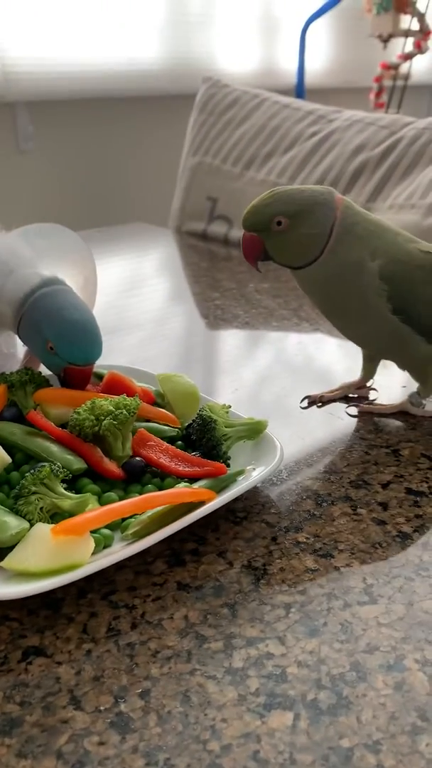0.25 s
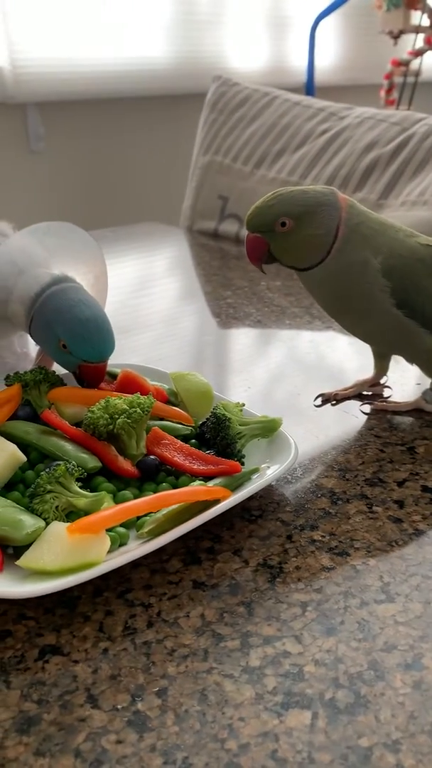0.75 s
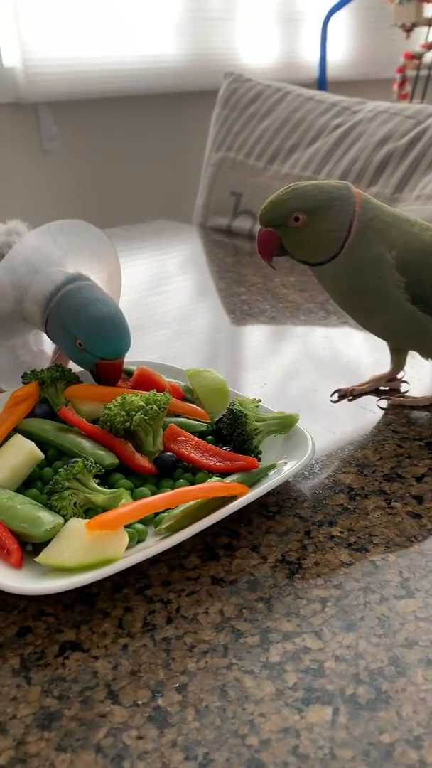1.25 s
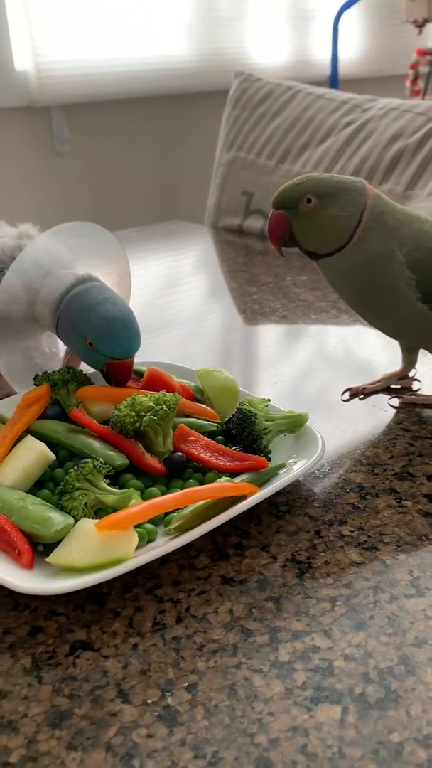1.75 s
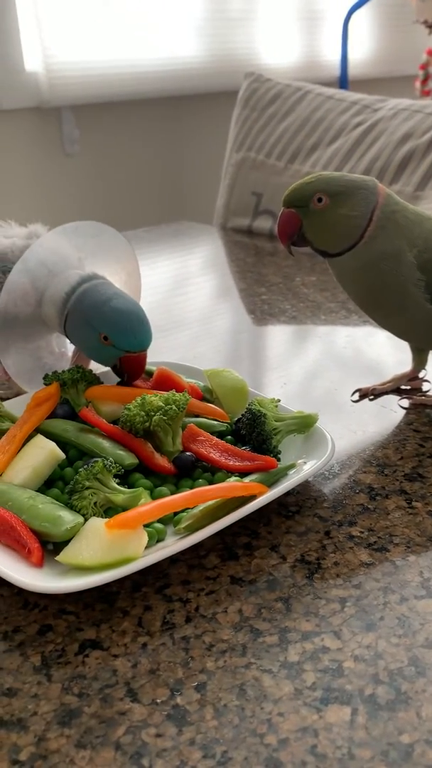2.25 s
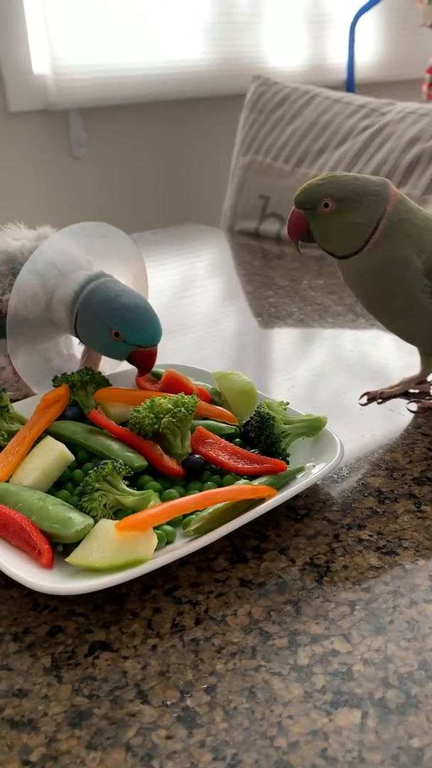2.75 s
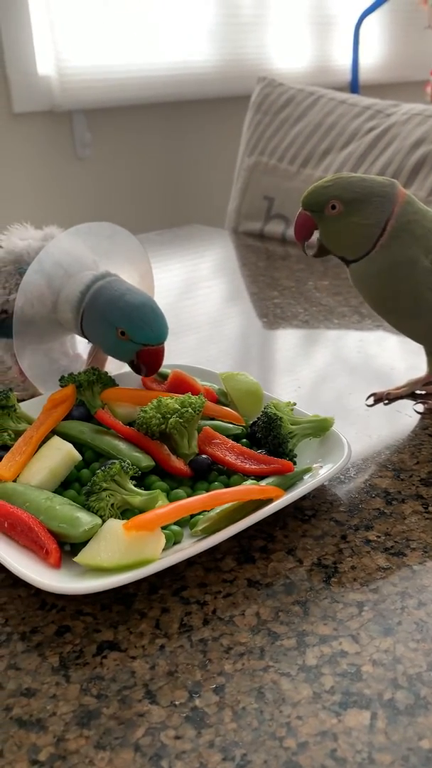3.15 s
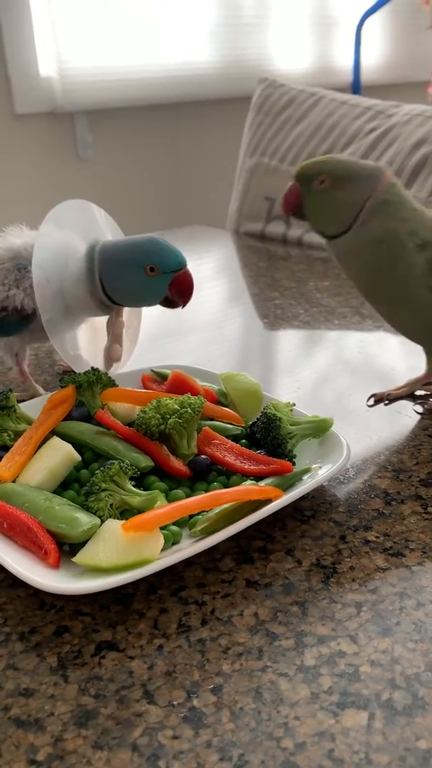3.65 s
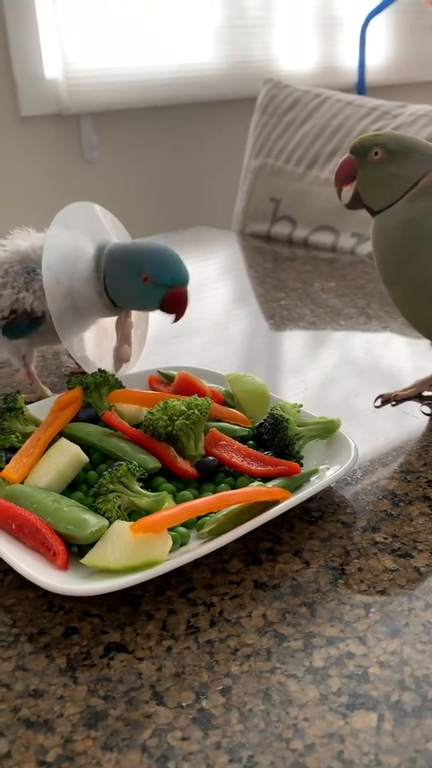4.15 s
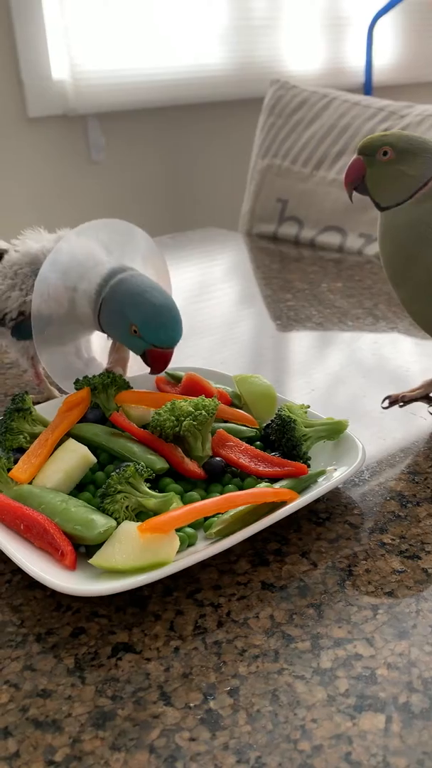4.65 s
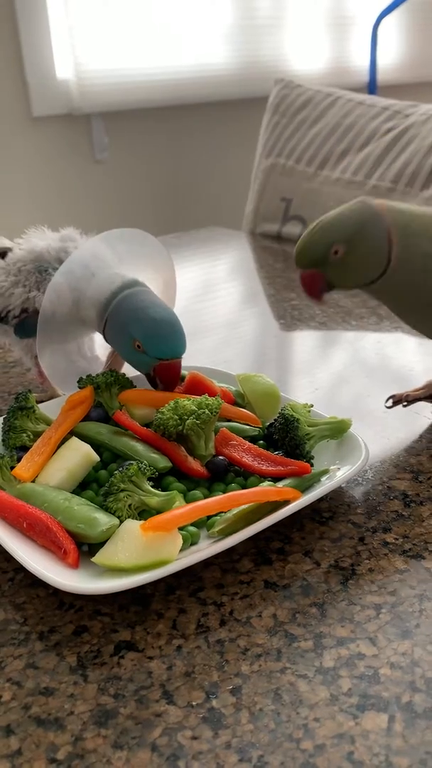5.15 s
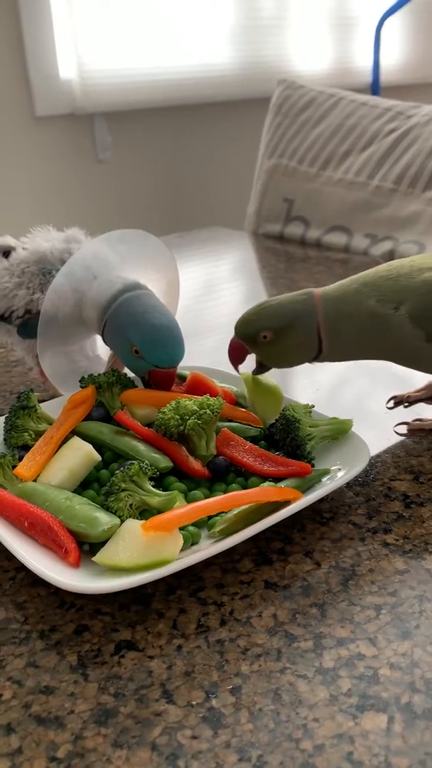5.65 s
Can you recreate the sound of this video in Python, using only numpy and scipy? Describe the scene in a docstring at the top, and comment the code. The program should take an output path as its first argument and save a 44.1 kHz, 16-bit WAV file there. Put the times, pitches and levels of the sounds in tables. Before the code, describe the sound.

A parrot whistles, chirps, hisses and trills in a quiet room over a low ventilation rumble, with beak clicks and soft plate knocks.

```python
"""A parakeet whistles, pips, trills and hisses in a quiet furnished room, as one of two at a plate of food.
Its syrinx gives harmonic stacks coloured by throat and mouth; the hisses are air ringing in the throat.
Beak clicks and plate knocks are struck decaying modes, close to a stone counter.
Ventilation rumbles below as coloured noise with motor tones, dipping at set times near the loudest calls.
A wall echo, near scatter and a diffuse tail place the birds; a small two-port recorder listens."""
import sys
import numpy as np
from scipy import signal
from scipy.fft import rfft, irfft, next_fast_len
from scipy.io import wavfile
from scipy.ndimage import uniform_filter1d

SR = 44100
rng = np.random.default_rng(int(sys.argv[2]) if len(sys.argv) > 2 else 0)


def file_out(sig):
    """Save sig as 16-bit WAV at sys.argv[1]."""
    # one column per channel
    cols = np.atleast_2d(sig).T
    # limit, then scale
    lim = np.clip(cols, -1, 1)
    pcm = np.round(lim * 32767).astype(np.int16)
    wavfile.write(sys.argv[1], SR, pcm)


N = 259308


def amp(db):
    """Decibels to gain."""
    return 10 ** (np.asarray(db) / 20)


def rms_one(x):
    """Scale to rms 1."""
    return x / np.sqrt(np.mean(x ** 2) + 1e-20)


def at_hz(points, hz):
    """Read a (Hz, value) table on a log frequency axis."""
    p = np.array(points)
    return np.interp(np.log(np.maximum(hz, 1)), np.log(p[:, 0]), p[:, 1])


def filtered(x, response):
    """Multiply the spectrum by response(Hz), padded so the end does not wrap round."""
    size = next_fast_len(x.shape[-1] + 4096)
    spectrum = rfft(x, size) * response(np.fft.rfftfreq(size, 1 / SR))
    return irfft(spectrum, size)[..., :x.shape[-1]]


def coloured(spectrum, channels=1):
    """Noise with a spectrum in dB per Hz, scaled to rms 1."""
    white = rng.standard_normal((channels, N))
    return rms_one(filtered(white, lambda hz: amp(at_hz(spectrum, hz))))


def drift(rate_hz, size):
    """Slow random wander of rms 1: noise through a two-pole low-pass."""
    r = np.exp(-2 * np.pi * rate_hz / SR)
    settle = SR // 4
    noise = rng.standard_normal(size + settle)
    return rms_one(signal.lfilter([1], [1, -2 * r, r * r], noise)[settle:])


def add(out, rows, make, fade_s):
    """Interpolate the rows over their samples, sound them, fade both ends and mix into out."""
    s, *columns = np.transpose(rows)
    at = np.arange(int(s[0] * SR), min(int(s[-1] * SR), N))
    t = at / SR
    # a sound that lasts to the very end gets no closing fade
    runs_to_end = s[-1] > N / SR - .01
    edge = np.clip(np.minimum(t - s[0], s[-1] - t + runs_to_end) / fade_s, 0, 1)
    sound = make(at, *[np.interp(t, s, c) for c in columns])
    out[at] += np.sin(edge * np.pi / 2) ** 2 * sound


# ventilation spectrum: hz, level_db (per Hz)
AIR_SPECTRUM = [(15, -39), (28, -19.5), (45, -4), (84, -7), (120, -3.5), (357, -4), (500, -13),
                (733, -17.5), (1640, -20.5), (2200, -27.5), (3460, -33), (6360, -39), (9000, -44),
                (15000, -66)]
# level of the rumble before the dips: time_s, level_db
AIR_LEVEL = [(0, -40.5), (1.5, -41), (2.9, -42.5), (3.5, -45.5), (4.5, -46.5), (5.0, -45.5), (5.88, -44.5)]
# how alike the rumble is at left and right: hz, likeness (0-1)
AIR_LIKENESS = [(40, .997), (70, .99), (140, .94), (280, .77), (500, .45), (800, .05), (16000, .05)]
# motor tones: hz, level_db, width_hz, steady_share (0-1)
MOTOR_TONES = [(64.8, -49.5, 6.9, 0.07), (107.6, -53, 6.4, 0.01), (242.6, -55.5, 2.4, 0.6),
               (355.8, -53.5, 6.5, 0.2), (481, -58, 3.2, 0), (1856, -60.5, 7.4, .75)]
# dips of the rumble: deepest_from_s, hold_s, sink_time_s, depth_db
RUMBLE_DIPS = [(.65, 0.057, 0.064, -10), (1.656, 0.062, .07, -12.5), (3.255, 0.069, .3, -17),
               (4.127, .01, .04, -7.5), (4.42, .01, .15, -7)]
DIP_RECOVER_S = 0.17


def ventilation():
    """Broad rumble, alike on both sides only in the bass, with centred motor tones that waver."""
    def likeness(hz):
        return np.clip(at_hz(AIR_LIKENESS, hz), 0, 1)

    mid, side = coloured(AIR_SPECTRUM, channels=2)
    mid = filtered(mid, lambda hz: np.sqrt((1 + likeness(hz)) / 2))
    side = filtered(side, lambda hz: np.sqrt((1 - likeness(hz)) / 2))
    t = np.arange(N) / SR
    s, level_db = np.transpose(AIR_LEVEL)
    total_db = np.interp(t, s, level_db)
    for deepest_s, hold_s, sink_s, depth_db in RUMBLE_DIPS:
        held_to_s = deepest_s + hold_s
        corners_s = [deepest_s - sink_s, deepest_s, held_to_s, held_to_s + DIP_RECOVER_S]
        total_db = total_db + np.interp(t, corners_s, [0, depth_db, depth_db, 0])
    gain = amp(total_db)
    out = gain * (mid + side * np.array([[1], [-1]]))
    for hz, tone_db, width_hz, steady in MOTOR_TONES:
        wander = drift(width_hz, N) + 1j * drift(width_hz, N)
        waver = steady * np.sqrt(2) + (1 - steady) * wander
        tone = np.real(waver * np.exp(2j * np.pi * hz * t))
        out = out + amp(tone_db) * gain / gain.mean() * tone   # tones dip with the rumble
    return out


def struck(events, modes):
    """Each blow rings every decaying mode with a random strength of its own."""
    s, strength_db = np.transpose(events)
    out, spread = np.zeros(N), rng.standard_normal((len(s), len(modes)))
    for k, (hz, level_db, t60_s) in enumerate(modes):
        blows = np.full(N, 1e-18)
        blows[(s * SR).astype(int)] = amp(strength_db + level_db - 7.5 + 3.0 * spread[:, k])
        r, w = amp(-60 / (t60_s * SR)), 2 * np.pi * hz / SR
        out += signal.lfilter([0, np.sin(w)], [1, -2 * r * np.cos(w), r * r], blows)
    return out


# beak clicks: time_s, strength_db (relative)
BEAK_CLICKS = [(0.155, -58.5), (0.3214, -50), (0.4894, -46), (0.9394, -56), (1.024, -47.5), (1.092, -27),
               (1.1651, -11), (3.6293, -41.5), (5.6914, -39)]
# ringing of the beak: hz, level_db, t60_s
BEAK_MODES = [(1200, -13, .004), (4300, -30, .003), (7040, 0, 0.0037), (8500, 11, .002),
              (11400, -8.5, .003), (14800, -20, .002)]
# beak knocks on the plate: time_s, strength_db (relative)
PLATE_KNOCKS = [(0.167, -23.5), (1.306, -27), (3.781, -24), (5.476, -22), (5.659, -26), (5.684, -23)]
# ringing of the plate: hz, level_db, t60_s
PLATE_MODES = [(480, -6, .02), (700, -5, 0.041), (950, -4.5, 0.0084), (1250, 5, .015), (1700, -6, 0.036)]
KNOCK_SOFT_HZ = 1500   # low-pass of the soft contact


def beaks():
    """Dry clicks of the beak, and duller knocks on the plate softened by a low-pass."""
    soft_contact = signal.butter(2, KNOCK_SOFT_HZ, fs=SR, output="sos")
    knocks = signal.sosfilt(soft_contact, struck(PLATE_KNOCKS, PLATE_MODES))
    return struck(BEAK_CLICKS, BEAK_MODES) + knocks


# throat weighting of overtones and leaking breath: hz, level_db
THROAT_COLOUR = [(150, -46.5), (400, -27.5), (1200, -13), (2000, -9), (3000, -7), (4000, -3.5), (5000, 1.5),
                 (6000, -4.5), (7500, -4.5), (9500, -1), (11500, -14), (13000, -16.5), (16000, -16.5)]
BREATH_AIR = coloured(THROAT_COLOUR)[0]
MOUTH_DB, MOUTH_OCTAVES = 9.5, 0.17   # height and half-width of the mouth resonance
FULL_VOICE_DB = -15   # level of the fully driven voice
# dB per overtone at full voice, extra for each dB softer, and the steepest fall allowed
FALL_DB, FALL_PER_SOFT_DB, DULLEST_DB = -1.11, -0.1455, -6.5
ROUNDING = .04   # share of a call over which pitch bends are rounded


def syrinx(at, hz, level_db, mouth_hz, first_db, breath_db, duller_db, odd_db):
    """A harmonic stack, duller when soft, shaped by throat and mouth; air leaks once a cycle."""
    hz = uniform_filter1d(hz, 1 + int(ROUNDING * len(at)), mode="nearest")
    jitter = 1 + .003 * drift(90, len(at))
    turn = 2 * np.pi * np.cumsum(hz * jitter) / SR
    k = np.arange(1, 17)[:, None]   # harmonic numbers
    soft_db = FULL_VOICE_DB - level_db
    fall_db = np.maximum(FALL_DB + FALL_PER_SOFT_DB * soft_db + duller_db, DULLEST_DB)
    mouth_db = MOUTH_DB * np.exp(-(np.log2(k * hz / mouth_hz) / MOUTH_OCTAVES) ** 2)
    stack_db = at_hz(THROAT_COLOUR, k * hz) + mouth_db + fall_db * (k - 1)
    stack_db = stack_db + first_db * (k == 1) + odd_db * (k % 2) * (k > 1)
    gains = amp(stack_db) * (k * hz < SR * .4)
    gains = gains * np.sqrt(2 / np.sum(gains ** 2, axis=0))   # stack at rms 1 before the flutter
    flutter = amp(2.0 * np.array([drift(50, len(at)) for _ in k]))
    tone = np.sum(gains * flutter * np.sin(k * turn), axis=0)
    leak = amp(breath_db) * BREATH_AIR[at] * (1 + 0.3 * np.sin(turn))
    return amp(level_db) * (tone + leak)


def short_note(out, s, ms, first_hz, last_hz, *settings):
    """One gliding note around its centre, swelling to the middle and fading at once."""
    half_s = ms / 2000
    rows = [(s - half_s, first_hz, *settings), (s + half_s, last_hz, *settings)]
    add(out, rows, syrinx, half_s)


# short pips: centre_s, length_ms, first_pitch_hz, last_pitch_hz, level_db, mouth_hz,
# fundamental_lift_db, breath_db (against the note)
SHORT_PIPS = [(.172, 15.4, 757, 560, -32, 4160, 11.5, -34), (1.309, 4.9, 662, 1102, -27.5, 4170, 9.5, -11),
              (1.485, 6, 1248, 1250, -21, 3800, 6.5, -13), (1.511, 6.8, 1232, 962, -20, 4400, 7, -18.5),
              (3.784, 8, 1152, 1550, -26.5, 4200, -17, 2.5),
              (3.948, 6.27, 1700, 2208, -9.5, 3730, -6.5, -8), (5.48, 9, 788, 756, -32.5, 1610, 14.5, -11),
              (5.661, 7.3, 1200, 1145, -17, 5520, 8, -2.7), (5.685, 6.2, 1790, 1700, -23, 5100, 17, -1.5)]


def pips():
    """Brief syrinx notes whose overtones fall off faster than in the long calls."""
    out = np.zeros(N)
    for row in SHORT_PIPS:
        short_note(out, *row, -2.5, 0)   # extra fall in dB per overtone; odd overtones untouched
    return out


# whistled calls, one curve each: time_s, pitch_hz, level_db, mouth_hz, fundamental_lift_db
WHISTLE_CURVES = [
    [(.365, 1200, -42, 2348, 19), (.378, 1168, -33, 2350, 19.5), (.432, 1162, -32, 2296, 18),
     (.444, 934, -33, 1900, 15.5), (.458, 793, -46.5, 1700, 12)],
    [(.518, 1786, -27, 4730, 2), (.548, 1657, -23.5, 4730, 11), (.575, 1667, -23, 4300, 12),
     (.597, 1830, -12.5, 3700, 3.5), (.625, 1901, -15.5, 3800, .6), (.654, 1951, -24, 4220, -0.5),
     (.68, 1915, -41.5, 4240, 17.5)],
    [(1.603, 1312, -28.5, 3500, 5), (1.609, 2020, -13, 4030, -3.5), (1.614, 2459, -15, 4630, 5),
     (1.622, 1975, -11.5, 3800, -7), (1.631, 1362, -20, 3450, -0.7), (1.641, 950, -18, 2830, 5.5),
     (1.652, 620, -45, 2970, 4.5)],
    [(2.05, 600, -55, 3070, 15), (2.11, 948, -44.5, 3380, 27), (2.164, 1216, -37, 2450, 19),
     (2.21, 1436, -39, 3340, -3), (2.314, 1461, -23.5, 4090, 1), (2.38, 1430, -23.5, 4240, 0),
     (2.444, 1290, -17.5, 4190, 2), (2.5, 1195, -19.5, 4500, 7), (2.53, 737, -33.5, 4450, 5.5)],
    [(2.845, 480, -32, 2570, 10), (2.869, 1035, -33, 2480, 14.5), (2.889, 1261, -29, 2560, 11.5),
     (2.937, 1606, -20.5, 3420, 5), (3.01, 1944, -15.5, 4540, -5), (3.06, 2288, -16, 5180, -4.5),
     (3.12, 2400, -24, 5110, 5), (3.15, 2466, -19, 4900, 5.5), (3.179, 2522, -22.5, 4800, 11.5),
     (3.219, 2182, -15.5, 4100, -6.5), (3.263, 1640, -27, 3580, -7), (3.3, 885, -38, 3295, -1)],
    [(4.195, 1654, -27.5, 4420, -2), (4.247, 1530, -25, 4150, -7.3), (4.305, 1503, -26.5, 3270, -4.5),
     (4.347, 1458, -24, 4420, -7), (4.415, 1297, -19.5, 4240, -3), (4.451, 1264, -22.5, 4900, -2),
     (4.475, 787, -34, 4740, 3.5)],
    [(5.795, 1989, -49.5, 2670, 13), (5.821, 2018, -40.5, 2670, 11), (5.861, 2732, -16.5, 2950, 1),
     (5.88, 2890, -11, 2915, -7.5)],
]
# breath against the tone: clear limit, hoarse limit, rise per octave/s of glide
CLEAR_DB, HOARSE_DB, DB_PER_GLIDE = -37, -18, 1.3


def whistled_calls():
    """Long gliding syrinx calls, breathier where the pitch moves fast."""
    out = np.zeros(N)
    for rows in map(np.array, WHISTLE_CURVES):
        glide = np.abs(np.gradient(np.log2(rows[:, 1]), rows[:, 0]))   # octaves per s
        breath_db = np.minimum(CLEAR_DB + DB_PER_GLIDE * glide, HOARSE_DB)
        none = 0 * glide   # no extra dullness, odd overtones untouched
        add(out, np.column_stack([rows, breath_db, none, none]), syrinx, fade_s=0.0018)
    return out


# unvoiced hisses: start_s, hold_s, first_level_db, last_held_level_db (both relative),
# lowest_resonance_start_hz, lowest_resonance_end_hz
HISS_EVENTS = [(1.821, .01, -33.5, -37.5, 3570, 3300), (1.86, 0.13, -40.5, -37.5, 3180, 2800),
               (2.528, .12, -35.5, -39, 2470, 2970), (4.474, .04, -32, -35, 2520, 2490),
               (4.557, .03, -31, -28.5, 2600, 2500)]
# spectrum of the broad air: hz, level_db (per Hz)
HISS_SPECTRUM = [(300, -55), (800, -51.5), (1900, -1.5), (2400, 1), (3000, -6), (3800, -0.5), (4600, 1.5),
                 (6200, 0), (8500, -1.5), (10500, -29), (13000, -32), (16000, -50)]
# throat resonances, lowest first: width_hz, level_db (against the broad air)
THROAT_RINGS = [(90, -1), (110, -3), (250, -4)]
HISS_UPPER_HZ = (3800, 6250)   # centres of the two upper resonances
HISS_TREBLE_DB, HISS_SPLIT_HZ = -1.26, 4700   # treble gain above the split
HISS_ATTACK_S, HISS_DIES_DB, HISS_RELEASE_DB_PER_S = .02, -61.5, 192.5


def hisses():
    """Lumpy air with no tone, ringing in three throat resonances that wobble and come and go."""
    out, air = np.zeros(N), coloured(HISS_SPECTRUM)[0]
    low = filtered(air, lambda hz: hz < HISS_SPLIT_HZ)
    low, high = rms_one(low), rms_one(air - low)

    def throat(at, level_db, lowest_hz):
        """Two bands of air plus narrow noise around each resonance."""
        centres_hz = [lowest_hz] + [hz + 0 * lowest_hz for hz in HISS_UPPER_HZ]
        lumps = amp(2.0 * np.array([drift(30, len(at)) for _ in range(5)]))
        sound = low[at] * lumps[3] + amp(HISS_TREBLE_DB) * high[at] * lumps[4]
        for hz, (width_hz, ring_db), lump in zip(centres_hz, THROAT_RINGS, lumps):
            wobble = drift(width_hz, len(at)) + 1j * drift(width_hz, len(at))
            centre = hz * (1 + 0.044 * drift(10, len(at)))
            ring = np.real(wobble * np.exp(2j * np.pi * np.cumsum(centre) / SR))
            sound += amp(ring_db + HISS_TREBLE_DB * (hz > HISS_SPLIT_HZ)) * lump * ring
        return amp(level_db - 6.0) * sound

    for s, hold_s, first_db, last_db, first_hz, last_hz in HISS_EVENTS:
        held_s = s + HISS_ATTACK_S + hold_s
        gone_s = held_s + (last_db - HISS_DIES_DB) / HISS_RELEASE_DB_PER_S
        rows = [(s, first_db, first_hz), (held_s, last_db, last_hz), (gone_s, HISS_DIES_DB, last_hz)]
        add(out, rows, throat, HISS_ATTACK_S)
    return out


# trill beats: centre_s, length_ms, pitch_hz, level_db, after_note_level_db
TRILL_BEATS = [(4.051, 5, 1707, -12.5, -38), (4.072, 8, 1873, -8, -38), (4.091, 5.5, 1854, -7, -22),
               (4.111, 6, 1978, -11, -15.5), (4.133, 7, 1926, -9.5, -21.5), (4.154, 8, 2035, -14.5, -40)]
BEAT_RISE = 1.09   # pitch ratio over each note
BEAT_MOUTH_HZ, BEAT_FIRST_DB, BEAT_BREATH_DB = 3950, -6, -19
TRILL_ODD_DB = -6   # odd overtones are weak in the beats
AFTER_S, AFTER_MS, AFTER_HZ = .006, 11, 2346   # delay, length, first pitch of the after-note
AFTER_MOUTH_HZ, AFTER_FIRST_DB, AFTER_BREATH_DB = 4500, 6.5, -8.5


def trill():
    """Quick rising syrinx beats, each overlapped by a higher, breathier after-note."""
    out = np.zeros(N)
    for s, ms, hz, level_db, after_db in TRILL_BEATS:
        short_note(out, s, ms, hz, hz * BEAT_RISE, level_db,
                   BEAT_MOUTH_HZ, BEAT_FIRST_DB, BEAT_BREATH_DB, 0, TRILL_ODD_DB)
        short_note(out, s + AFTER_S, AFTER_MS, AFTER_HZ, AFTER_HZ * BEAT_RISE, after_db,
                   AFTER_MOUTH_HZ, AFTER_FIRST_DB, AFTER_BREATH_DB, 0, 0)
    return out


# the near wall: delay_ms, left_db, right_db
WALL_ECHOES = [(6.3, -16.5, -19)]
# decay of the diffuse tail: hz, t60_s
TAIL_T60 = [(500, 0.36), (1500, 0.42), (3000, 0.48), (8000, 0.3), (14000, 0.38)]
TAIL_DB = -11
SCATTER_DB, SCATTER_T60_S = -5, 0.15   # plate, counter and cushions close by


def room(x):
    """Direct sound, a near-wall echo, near scatter, and a diffuse tail whose decay varies with pitch."""
    t = np.arange(SR * 3 // 4) / SR
    noise, tail = rng.standard_normal((2, len(t))), 0
    for low_hz in 250 * 2.0 ** np.arange(6):   # octave bands
        octave = signal.butter(2, [low_hz, 2 * low_hz], "band", fs=SR, output="sos")
        decay = amp(-60 * t / at_hz(TAIL_T60, low_hz * np.sqrt(2)))
        tail = tail + signal.sosfilt(octave, noise) * decay
    tail = tail * np.clip(t / 0.004, 0, 1)   # reflections need time to build up
    response = amp(TAIL_DB) * tail / np.sqrt(np.sum(tail ** 2) / 2)
    near = rng.standard_normal((2, len(t))) * amp(-60 * t / SCATTER_T60_S)
    response += amp(SCATTER_DB) * near / np.sqrt(np.sum(near ** 2) / 2)
    response[:, 0] += 1   # direct sound
    for ms, left_db, right_db in WALL_ECHOES:
        response[:, int(ms * SR / 1000)] += amp([left_db, right_db])
    return signal.fftconvolve(x[None], response, axes=1)[:, :N]


def scene():
    """Birds and beaks in the room, over the ventilation."""
    birds = beaks() + pips() + whistled_calls() + hisses() + trill()
    return room(birds) + ventilation()


# phase lag of the right port behind the left: hz, lag_radians
RIGHT_LAG = [(0, 0), (500, .2), (800, .9), (1200, 0), (1900, .3), (2700, 1.2), (3800, .7), (4700, 3.14),
             (9700, 9.42), (14700, 15.7), (22050, 16)]
# level of the left port over the right: hz, balance_db
LEFT_OVER_RIGHT = [(100, 0), (400, 1.5), (1000, -3), (1450, 0), (1900, -4), (2800, -3), (3300, 5),
                   (3900, 3), (4600, -5), (5500, 1), (6300, 2), (6800, 0)]
SHARED_BASS_HZ = 150   # close ports: the side signal fades below this
ONE_PORT_HZ = 5560   # the side signal fades above this
CEILING = .95   # of full scale


def record(dry):
    """Two-port recorder: port balance and lag, highest peaks rounded, then a steep treble cut-off."""
    sign = np.array([[1], [-1]])   # left, right
    lag_hz, lag = np.array(RIGHT_LAG).T
    mid, side = (dry[0] + dry[1]) / 2, (dry[0] - dry[1]) / 2

    def side_width(hz):
        treble = 1 / np.sqrt(1 + (hz / ONE_PORT_HZ) ** 16)
        return treble * hz / np.hypot(hz, SHARED_BASS_HZ)

    def ports(hz):
        balance = amp(sign * at_hz(LEFT_OVER_RIGHT, hz) / 2)
        return balance * np.exp(.5j * sign * np.interp(hz, lag_hz, lag))

    x = filtered(mid + sign * filtered(side, side_width), ports)
    rounded = x / (1 + (x / CEILING) ** 6) ** (1 / 6)
    cutoff = signal.cheby2(12, 70, 15700 * 1.07, fs=SR, output="sos")   # 70 dB down at this Hz
    return signal.sosfilt(cutoff, rounded)


dry = scene()
out = record(dry)
file_out(out)
```